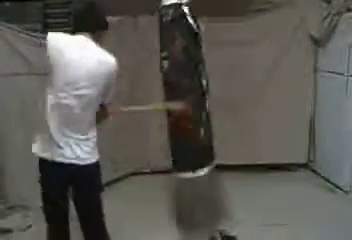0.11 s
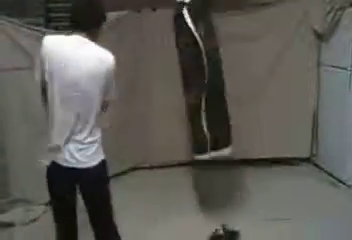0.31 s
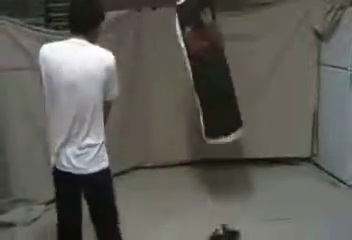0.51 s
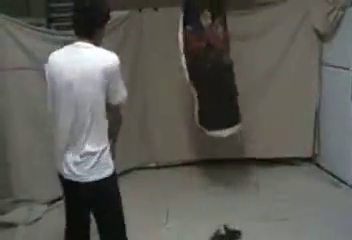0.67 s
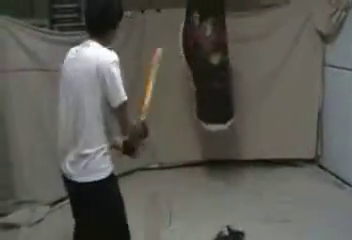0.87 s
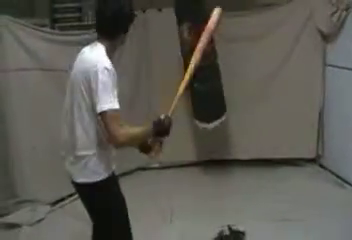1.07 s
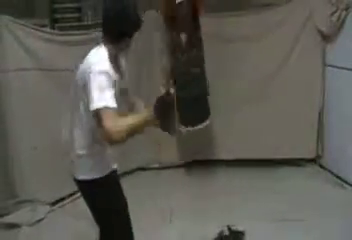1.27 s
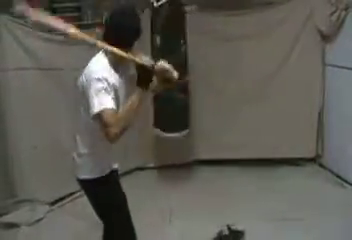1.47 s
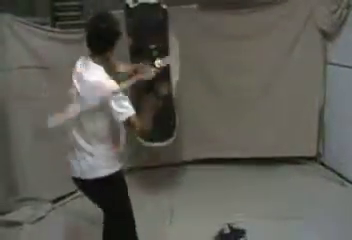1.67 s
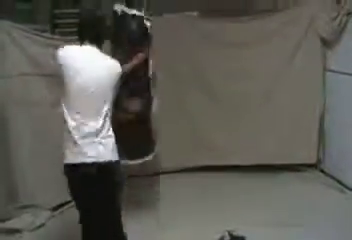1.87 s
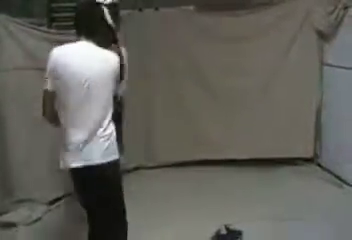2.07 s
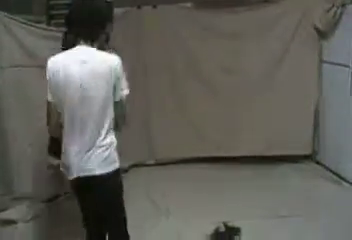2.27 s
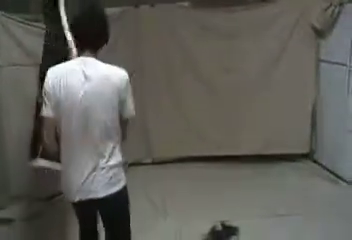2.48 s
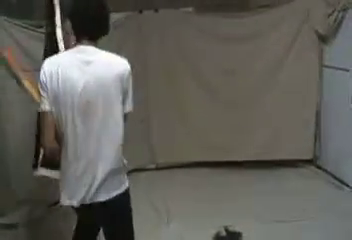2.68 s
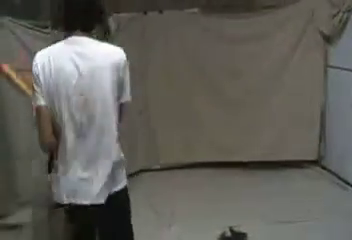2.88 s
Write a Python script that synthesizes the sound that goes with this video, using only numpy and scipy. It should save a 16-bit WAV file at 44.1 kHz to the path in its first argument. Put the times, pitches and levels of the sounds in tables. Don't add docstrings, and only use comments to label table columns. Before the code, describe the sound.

Two explosive bat blows on a heavy punching bag, with low thuds, booming mount and room echo

```python
import sys
import numpy as np
from scipy import signal
from scipy.fft import rfft, irfft
from scipy.io import wavfile
from scipy.ndimage import uniform_filter1d

SR = 44100
rng = np.random.default_rng(int(sys.argv[2]) if len(sys.argv) > 2 else 0)


def persist_wave(psi):
    counts = np.round(np.clip(psi, -1, 1) * 32767).astype(np.int16)
    wavfile.write(sys.argv[1], SR, np.atleast_2d(counts).T)


def elevation(decibels):
    levels = np.asarray(decibels, float)
    return 10 ** (levels / 20)


N = 132300
T = np.arange(N) / SR
BANDS_HZ = 25 * 2 ** np.arange(0, 9.1, 1 / 3)

# pitch in Hz, drift in Hz, level in dB.
HUM = [(58, 2.5, -43), (113.5, 1.5, -36)]
# frequency in Hz, level in dB per Hz.
AIR_COLOUR = [(20, -2), (45, -2), (70, -12), (140, -21.5), (400, -31.5), (1500, -38.5), (5000, -48),
              (11000, -52)]
# frequency in Hz, side level minus mid level in dB.
SIDE_DB = [(30, -7), (110, -26), (340, -13.5), (700, -12.5), (1500, -8), (3300, -3.5), (5900, 0.5),
           (10500, -2.5)]
# centre in seconds, half length in seconds, level in dB, tilt in dB per octave.
SCUFFS = [(0.139, 0.013, -49.5, 6), (0.203, 0.037, -41.5, 1.7), (1.002, .025, -43, 1.1),
          (1.051, 0.039, -45, 1), (1.922, 0.07, -50.5, 2.7), (1.951, 0.0079, -52.5, 7),
          (2.504, 0.076, -39, -3), (2.633, 0.022, -43, -3.5), (2.661, 0.011, -32.5, 2.5),
          (2.689, 0.062, -39, -0.5), (1.394, 0.059, -59, 2)]
# frequency in Hz, level in dB per Hz.
SCUFF_COLOUR = [(150, -34), (250, -5.5), (449, -9), (525, -4), (818, -6.5), (2550, -8.5), (10900, -22.5),
                (14200, -45), (22000, -120)]
# level in dB, pitch in Hz.
TICKS = [(-33, 3300), (-27, 1300), (-30, 400), (-24, 150)]
TICK_S = [.102, .178, 2.998, .002]
# start in seconds, level in dB.
JOLTS = [(.265, -12), (.33, -10.5), (.415, -10), (.49, -15.5), (.545, -13), (.60, -19.5), (.67, -22),
         (.83, -26), (2.10, -14.5), (2.16, -13.5), (2.24, -10), (2.32, -11), (2.375, -13), (2.46, -20),
         (2.50, -24), (2.56, -29), (2.69, -30)]
# pitch in Hz, level in dB, time to fade 60 dB in seconds.
MOUNT_TONES = [(31.5, 2.1, 0.41), (59.8, 11, 0.15), (75.1, 8, 0.2)]
# centre in seconds, half length in seconds, level in dB, pitch in Hz.
GROANS = [(0.686, 0.056, -44, 382), (1.328, 0.17, -54.5, 1520), (1.42, 0.11, -53, 395),
          (2.562, 0.046, -37, 388), (2.611, 0.023, -41.5, 1080), (0.96, 0.073, -47, 361)]
# time in seconds, level in dB.
WASH_LEVEL = [
    [(0.236, -19.5), (0.246, -20.5), (0.284, -18), (0.416, -22.5), (0.458, -27), (0.508, -25.5),
     (0.94, -56.5), (0.95, -63)],
    [(2.056, -16.5), (2.06, -23.5), (2.158, -18.5), (2.204, -26.5), (2.4, -30), (2.568, -45.5),
     (2.652, -44.5), (2.85, -55)],
]
# frequency in Hz, level in dB per Hz.
WASH_COLOUR = [
    [(76, -45), (130, -6), (169, -1.5), (210, -6.5), (410, -20.5), (1420, -20.5), (10900, -40.5),
     (14200, -92), (22000, -120)],
    [(76, -29.5), (130, -0.5), (195, 0), (278, -10.5), (1100, -20.5), (2180, -22), (10900, -35.5),
     (14200, -100), (22000, -120)],
]
# frequency in Hz, change in dB per second.
WASH_FADE = [(100, -73), (200, -34.5), (500, -24), (1000, -18), (2400, 2.5), (4000, 3.5), (8000, -18),
             (10200, -28), (11000, -99)]
# frequency in Hz, width in Hz, boost in dB.
RESONANCES = [(1510, 390, 2.5), (2300, 500, 3.5), (3490, 285, 3)]
# start in seconds, crack level in dB, thud level in dB.
WHACKS = [
    (0.2257, 6.5, -13.5),
    (2.0442, 3.5, -8.5),
]
# frequency in Hz, level in dB per Hz.
CRACK_COLOUR = [(200, -5), (400, -9), (750, -16.5), (1300, -6.5), (2200, -5.5), (4000, -16), (10500, -22),
                (11500, -36)]
# pitch in Hz, level in dB, time to fade 60 dB in seconds.
BAG_TONES = [(62.7, 0, 0.91), (106.6, 7, 0.63), (163.5, -3.5, 0.39), (260, 10, .6)]
# pitch in Hz, level in dB, time to fade 60 dB in seconds.
BLOW_TONES = [(145, 0, .045), (85, -14, .07), (290, -12, .03)]


def at(table, hz):
    points = np.array(table, float)
    return np.interp(np.log(hz), np.log(points[:, 0]), points[:, 1])


def unit(x, lo_hz, hi_hz):
    f = np.fft.rfftfreq(N, 1 / SR)
    spectrum = rfft(np.atleast_2d(x)[0])
    inside = (f > lo_hz) & (f < hi_hz)
    return x * N / np.sqrt(2 * np.sum(np.abs(spectrum[inside]) ** 2))


def noise(colour):
    f = np.fft.rfftfreq(N, 1 / SR)[1:]
    spectrum = rfft(rng.standard_normal((2, N)))[:, 1:]
    spectrum = spectrum * elevation(at(colour, f)) * (f > colour[0][0] / 2)
    spectrum[1] *= elevation(at(SIDE_DB, f))
    bands_away = 3 * np.log2(f / BANDS_HZ[:, None])
    weight = np.where(np.abs(bands_away) < 1, np.cos(np.pi / 2 * bands_away) ** 2, 0)
    return irfft(np.pad(weight[:, None] * spectrum, ((0, 0), (0, 0), (1, 0))), N)


def walk(rate_hz, count=1):
    k = int(SR / rate_hz)
    steps = np.repeat(rng.standard_normal((count, N // k + 1)), k, axis=1)
    return 1.27 * uniform_filter1d(uniform_filter1d(steps, k), k)[:, :N]


def ring(hits, tones, push_s, rise_s=.0001):
    out = np.zeros(N)
    mix = rng.standard_normal((len(hits), len(tones)))
    push = np.sin(np.pi * np.arange(int(push_s * SR)) / int(push_s * SR))
    for (start, db), row in zip(hits, mix):
        t = np.clip(T - start, 0, None)
        for (hz, tone_db, t60), m in zip(tones, row):
            fade = elevation(db + tone_db + 2.0 * m - 60 * t / t60) * (1 - np.exp(-t / rise_s))
            out -= fade * np.sin(2 * np.pi * hz * (1 + 0.029 * m) * t)
    return signal.fftconvolve(out, push / push.sum())[:N]


def swell(centre, half):
    return np.exp(-.5 * ((T - centre) / half) ** 2)


def mono(x):
    return np.array([x, 0 * x])


def room():
    flutter = elevation(2.4 * walk(15, count=len(BANDS_HZ)))[:, None]
    air = unit((noise(AIR_COLOUR) * flutter).sum(0), 195, 10000) * elevation(-46.5)
    hum = 0
    for hz, drift_hz, db in HUM:
        level = np.sqrt(2) * elevation(db + 1.8 * walk(9.12)[0])
        pitch = hz + drift_hz * walk(14)[0] / 2
        hum = hum + level * np.sin(2 * np.pi * np.cumsum(pitch) / SR)
    return air + mono(hum)


def shoes():
    bands = noise(SCUFF_COLOUR)
    bands = bands / np.std(bands[:, 0].sum(0))
    grit = elevation(0.83 * walk(120)[0])
    out = 0
    for centre, half, db, tilt_db in SCUFFS:
        colour = elevation(db + tilt_db * np.log2(BANDS_HZ / 2000))
        out = out + np.tensordot(colour, bands, 1) * swell(centre, half) * grit
    for start, (db, hz) in zip(TICK_S, TICKS):
        tones = [(hz, 0, .004), (hz * 1.3, -2, .004), (hz * 1.9, -5, .003), (hz * 3.1, -9, .003)]
        out = out + mono(ring([(start, db)], tones, .00007))
    return out


def swish():
    hz, rise_s, levels_db = 176, 0.017, (-22.5, -19.5)
    colour = [(hz / 2, -6), (hz, 0), (600, -22), (3000, -38), (11000, -52)]
    gust = unit(noise(colour).sum(0), 50, 11000)
    level = 0
    for (start, _, _), db in zip(WHACKS, levels_db):
        level = level + elevation(db) * np.exp(np.clip(T - start, -9, 0) / rise_s) * (T < start + .01)
    return gust * level


def mount():
    out = mono(ring(JOLTS, MOUNT_TONES, push_s=0.0019, rise_s=0.014))
    for centre, half, db, hz in GROANS:
        colour = [(hz * .8, -40), (hz * 1.015, -6), (hz, 0), (hz * 0.947, -6), (hz * 1.65, -40), (hz * 2, -90)]
        band = noise(colour).sum(0)
        out = out + band / np.std(band[0]) * elevation(db) * swell(centre, half)
    return out


def wash():
    out = 0
    for (start, _, _), rows, colour in zip(WHACKS, WASH_LEVEL, WASH_COLOUR):
        bands = noise(colour) * elevation(0.27 * walk(25, count=len(BANDS_HZ)))[:, None]
        bands = bands / np.std(bands[16:21, 0].sum(0))
        points = np.array(rows)
        db = np.interp(T, points[:, 0], points[:, 1])
        db = db - 80 * np.clip(T - points[-1, 0], 0, 9)
        fade = at(WASH_FADE, BANDS_HZ)[:, None] * np.clip(T - start, 0, 9)
        level = elevation(db + fade) * np.clip((T - start) / 0.021, 0, 1)
        out = out + (bands * level[:, None]).sum(0)
    crackle = elevation(1.8 * walk(150)[0] - 2.0)
    f = np.fft.rfftfreq(N, 1 / SR)
    resonance_db = sum(db * np.exp(-.5 * ((f - hz) / width * 2) ** 2) for hz, width, db in RESONANCES)
    return irfft(rfft(out * crackle) * elevation(resonance_db), N)


def whacks():
    hold_s, crack_t60_s, blow_db = (0.0038, 0.0046), 0.0054, (7, 7)
    level = 0
    for (start, db, _), hold in zip(WHACKS, hold_s):
        fade_db = 60 * np.clip(T - start - hold, 0, 1) / crack_t60_s
        level = level + elevation(db - fade_db) * (T >= start)
    hiss = unit(noise(CRACK_COLOUR).sum(0), 200, 16000)
    crack = hiss * level * np.array([[1], [.3]])
    blow = ring([(start, db) for (start, _, _), db in zip(WHACKS, blow_db)], BLOW_TONES, 0.00063)
    thud = ring([(start, db) for start, _, db in WHACKS], BAG_TONES, push_s=0.0084, rise_s=0.013)
    return crack + mono(blow + thud)


def scene():
    mid, side = room() + shoes() + swish() + mount() + wash() + whacks()
    lean_db = 0.97
    return np.array([(mid + side) * elevation(lean_db / 2), (mid - side) * elevation(-lean_db / 2)])


def roll_off(x):
    return signal.sosfilt(signal.butter(12, 11060, fs=SR, output="sos"), x)


def record(dry):
    overloaded = np.clip(dry, -1.2, 1.2)
    top_cut = signal.ellip(8, .1, 60, 11050, fs=SR, output="sos")
    mix = np.clip(signal.sosfiltfilt(top_cut, overloaded), -1, 1)
    return roll_off(mix)


dry = scene()
out = record(dry)
persist_wave(out)
```